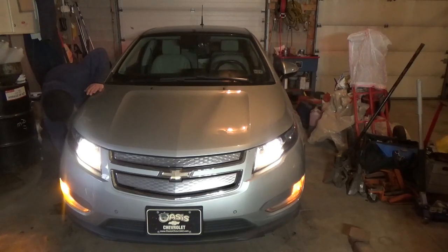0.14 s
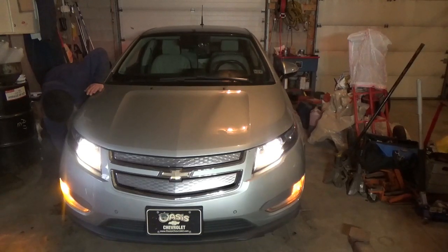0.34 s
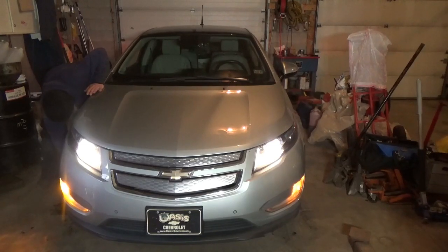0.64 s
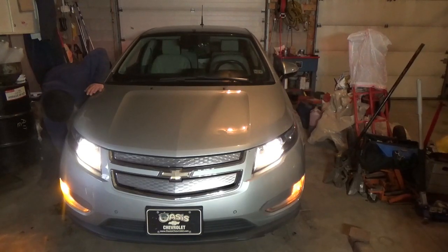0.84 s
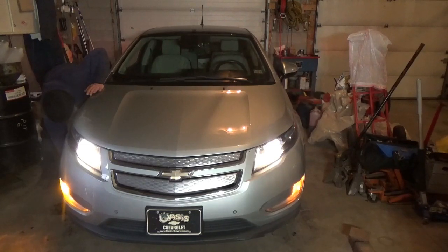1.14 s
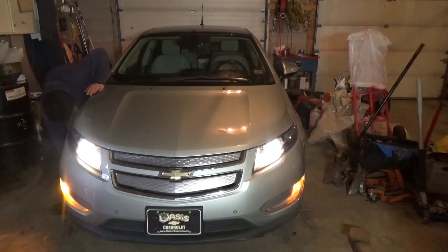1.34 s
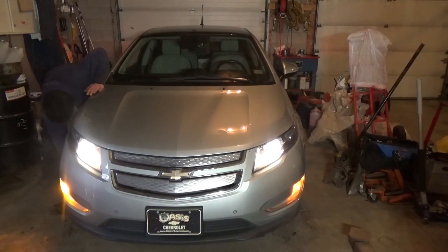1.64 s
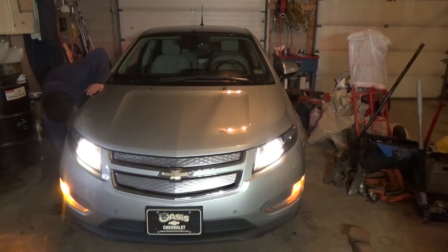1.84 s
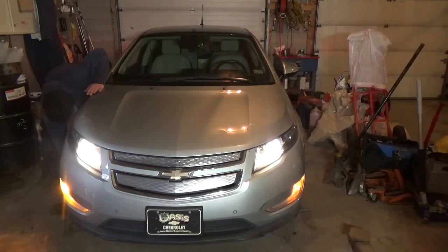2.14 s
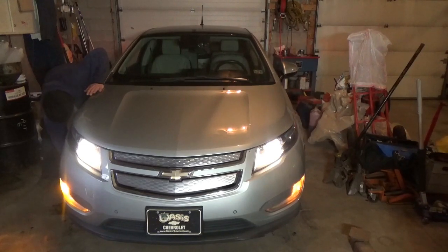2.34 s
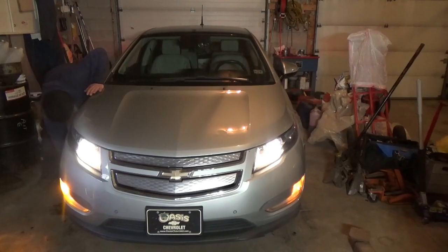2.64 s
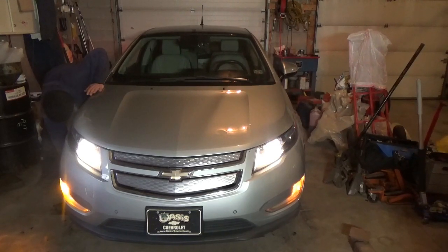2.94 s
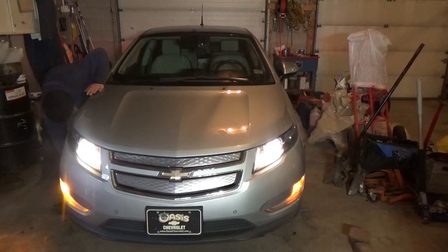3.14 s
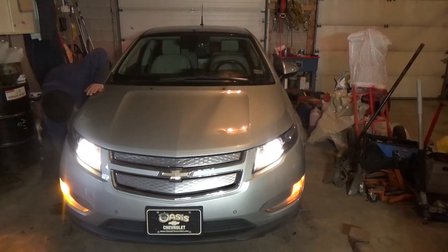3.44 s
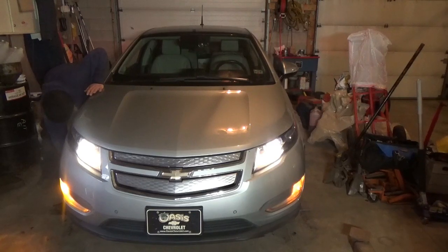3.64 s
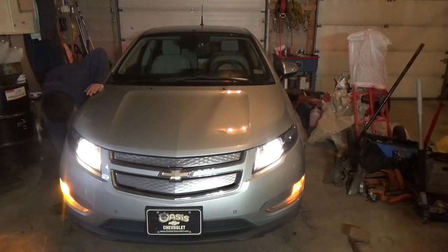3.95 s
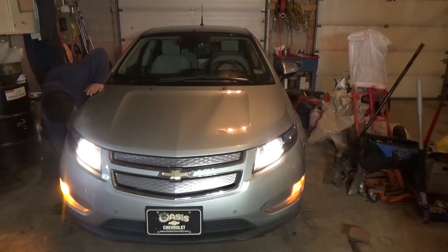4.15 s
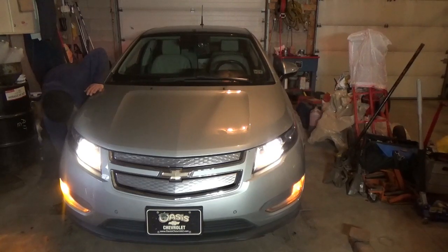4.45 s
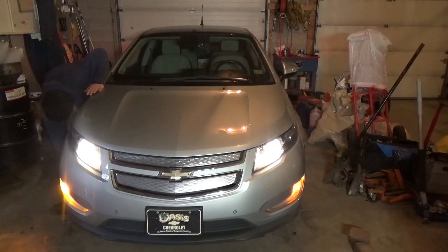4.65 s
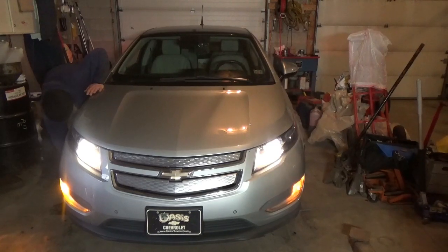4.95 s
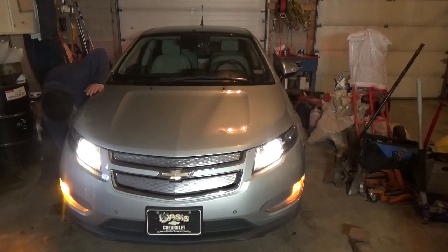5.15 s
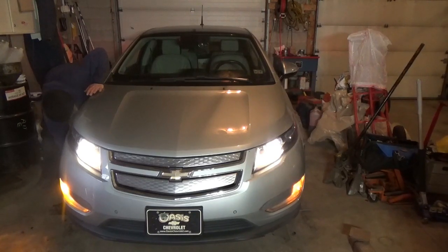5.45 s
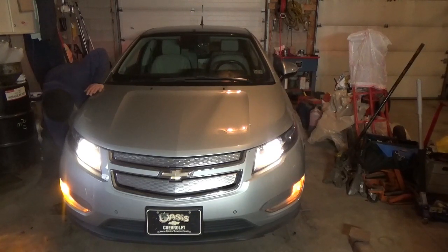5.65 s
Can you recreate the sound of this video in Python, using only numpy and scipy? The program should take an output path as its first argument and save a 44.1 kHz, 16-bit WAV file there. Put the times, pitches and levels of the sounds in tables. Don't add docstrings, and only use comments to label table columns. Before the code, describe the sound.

A strong, continuous rush of escaping tire air, bright and ringing, wavers and changes color late on, with a faint low cooling fan beneath.

```python
import sys
import numpy as np
from scipy import signal
from scipy.fft import rfft, irfft, next_fast_len
from scipy.io import wavfile
from scipy.ndimage import uniform_filter1d, map_coordinates

SR = 44100
rng = np.random.default_rng(int(sys.argv[2]) if len(sys.argv) > 2 else 0)


def ratio(d):
    e = np.asarray(d, float) / 20
    return 10 ** e


def dump_mix(stems):
    frames = np.atleast_2d(stems).T
    limited = np.clip(frames, -1, 1)
    pcm = np.round(limited * 32767).astype(np.int16)
    wavfile.write(sys.argv[1], SR, pcm)


N = 254898
T = np.arange(N) / SR
SIZE = next_fast_len(N + SR)
HZ = np.maximum(np.arange(SIZE // 2 + 1) * SR / SIZE, 1)
LEFT_RIGHT = np.array([[1], [-1]]) / 2


def unit(x):
    return x / np.sqrt(np.mean(x ** 2))


def along_hz(table):
    hz, value = np.transpose(table)
    return np.interp(np.log(HZ), np.log(hz), value)


def shaped(x, gain):
    return irfft(rfft(x, SIZE) * gain, SIZE)[..., :N]


def resonance(hz, width):
    return 1 / (1 + (2 * (HZ - hz) / width) ** 2)


def walk(rate):
    hold = int(SR / rate)
    steps = np.repeat(rng.standard_normal(N // hold + 1), hold)
    smooth = uniform_filter1d(uniform_filter1d(steps, hold), hold)
    return unit(smooth[:N])


def two_ears(alike):
    shared = rfft(rng.standard_normal(SIZE))
    own = rfft(rng.standard_normal((2, SIZE)))
    alike = np.clip(alike, 0, 1)
    return np.sqrt(alike) * shared + np.sqrt(1 - alike) * own


# (time [s], flow against the mean of the grip [dB])
FLOW = [(0.0, 0), (0.5, .5), (0.75, -.5), (0.9, .5), (1.3, 0), (4.2, 0), (4.33, -1), (4.47, 1), (4.6, -.5),
        (4.9, 0), (5.06, .5), (5.22, -.5), (5.45, 0), (5.66, 0), (5.78, -1.5)]
# (start [s], end [s])
SHIFTS = [
    (4.27, 4.44),
    (4.95, 5.29),
    (5.45, 5.6),
]
# (frequency [Hz], level [dB per Hz])
JET_STILL = [(150, -43), (250, -19.5), (366, -38.5), (403, -32), (659, -16.5), (773, -7.5), (950, -11.5),
             (1080, -6), (2070, -9.5), (2390, -5), (4030, -8.5), (4370, -6.5), (6920, -7), (8380, -13.5),
             (11200, -2.5), (14500, -57), (22000, -120)]
JET_TILTED = [(150, -52), (250, -21), (378, -32), (760, -13), (920, -17), (1100, -7), (1280, -11),
              (1510, -6.5), (2140, -8), (2890, -6.5), (3080, -6), (5120, -4), (6390, -5), (8240, -21),
              (11200, -11.5), (14500, -39), (22000, -120)]
JET_LOOSE = [(150, -53), (250, -22), (472, -26), (638, -9), (810, -9), (891, -6), (1530, -9), (1940, -8),
             (2390, -12.5), (3970, -5), (5720, -4), (8240, -7), (11200, 1.5), (14500, -38), (22000, -120)]
JET_TURNED = [(150, -49), (250, -18), (511, -17), (628, -7), (714, -21), (760, -8), (1100, -15),
              (1210, -12), (1770, -7.5), (2310, -13.5), (5280, -9), (7860, -11), (11200, 6), (14500, -38),
              (22000, -120)]
# (frequency [Hz], width [Hz], level [dB])
RING_STILL = [(4273, 35, -3), (4380, 60, -5), (4460, 50, -5), (4540, 40, -3), (4655, 30, -6),
              (4829, 40, -3), (4936, 30, -3), (5110, 50, -5), (5155, 25, -4), (5200, 25, -2),
              (5315, 30, -3), (5437, 30, -4), (5670, 60, -3), (5760, 40, -4), (5862, 25, -1),
              (6018, 35, -4), (6210, 25, 1), (6255, 25, -2), (6420, 60, -4), (6529, 35, -3), (6600, 25, -4),
              (6690, 30, -1), (6770, 50, -3), (6830, 30, -3), (6933, 25, -3), (7030, 60, -5),
              (1618, 94, -6), (1895, 94, -7.5), (2308, 31, -6), (2675, 36, -10), (3040, 50, -7.5),
              (3472, 79, -7), (3800, 30, -4), (7500, 77, -23), (8290, 81, -10), (10000, 64, -15),
              (10600, 160, -3.5), (10940, 59, 3.5)]
RING_TILTED = [(4950, 250, -4), (5280, 350, -1), (5600, 150, -4), (6150, 150, -3), (6600, 120, -5),
               (10850, 200, -2)]
RING_LOOSE = [(4040, 250, -9), (5480, 250, -2), (5850, 250, -2), (6590, 150, -5), (10900, 200, -2)]
RING_TURNED = [(1750, 300, -11), (4030, 250, -6), (5200, 400, -3), (5770, 150, -4), (10900, 250, -2)]
VALLEY = (-4.5, -0.5, 1.5, 2)
SCATTER = (-2.5, -8.5, -6.5, -7.5)
SWAY = (0.26, 0.81, 1, 0.87)
WANDER = (.0001, .0012, .0012, .0012)
# (low rush [dB], throat [dB], jet [dB], top whistle [dB], lean to the left [dB])
GRIP_LEVELS = [
    (-41.5, -37.5, -28, -30, 0.1),
    (-39, -34, -24.5, -29, -0.3),
    (-42.5, -37.5, -27, -30, -.2),
    (-41, -37, -26.5, -28.5, -.1),
]
FOLLOW = (0.5, 1.1, 1.06, .3)


def escaping_air():
    flow_db = np.interp(T, *np.transpose(FLOW))
    shifted = [np.interp(T, shift, (0, 1)) for shift in SHIFTS]
    moved = np.array([np.ones(N)] + shifted + [np.zeros(N)])
    shares = np.clip(moved[:-1] - moved[1:], 0, 1)
    colours = (JET_STILL, JET_TILTED, JET_LOOSE, JET_TURNED)
    rings = (RING_STILL, RING_TILTED, RING_LOOSE, RING_TURNED)
    parts = 0
    for share, *settings in zip(shares, colours, rings, VALLEY, SCATTER, SWAY, WANDER):
        parts = parts + np.sqrt(share) * np.array(chuck_grip(*settings))
    *band_db, lean_db = np.transpose(GRIP_LEVELS) @ shares
    flicker_db = np.outer((0, 0, 0, 1), 0.39 * walk(14) + 0.34 * walk(50))
    gains = ratio(np.array(band_db) + np.outer(FOLLOW, flow_db) + flicker_db)
    return np.sum(gains[:, None] * parts, axis=0) * ratio(lean_db * LEFT_RIGHT)


# (frequency [Hz], width [Hz], level [dB])
GARAGE_MODES = [(564, 34, -19), (626, 32, -10), (712, 44, -11), (762, 16, -4), (845, 22, -7),
                (915, 14, -7.5), (1010.5, 25, -3), (1074.4, 17.3, 2.5), (1115, 22, -1), (1200, 20, -2.5),
                (1213, 8.2, -5.5), (1270, 9.4, -15), (1351, 25, -2), (1417, 8.6, -15), (1462, 8.7, -1)]


def chuck_grip(colour, rings, valley_db, scatter_db, sway, wander_s):
    broad = ratio(along_hz(colour) + valley_db)
    ringing = 0
    for hz, width, db in rings + GARAGE_MODES:
        ringing = ringing + ratio(2 * db) * resonance(hz, width) ** 1.52
    flutter_db = 0.97 * (0.68 * walk(9) + 0.5 * walk(40))
    jet = shaped(rng.standard_normal(N) * ratio(flutter_db), np.sqrt(broad ** 2 + ringing))
    jet = map_coordinates(jet, [(T + wander_s * walk(3)) * SR], order=3, mode="mirror")
    angle = sway * walk(1.466)
    walls = np.cos(angle) * shaped(jet, wall_echoes()) + np.sin(angle) * shaped(jet, wall_echoes())
    scattered = ratio(scatter_db) * broad * two_ears(0.12)
    heard = (rfft(jet + walls, SIZE) + scattered) * from_the_right()
    return [unit(irfft(heard * share, SIZE)[:, :N]) for share in bands()]


BAND_EDGES = (1500, 3500, 7300)


def bands():
    above = [np.clip(0.5 + 3 * np.log2(HZ / edge), 0, 1) for edge in BAND_EDGES]
    return [1 - above[0], above[0] - above[1], above[1] - above[2], above[2]]


# (frequency [Hz], left minus right [dB])
LEFT_TILT = [(60, -9), (110, -2), (190, 0.0), (350, -5.5), (630, -0.5), (1120, -1.5), (2020, -1.5),
             (3620, -2.0), (6510, -1.5), (11700, 0)]


def from_the_right():
    left_lag_s = 2.2e-5
    lag = np.exp(-2j * np.pi * HZ * left_lag_s * LEFT_RIGHT)
    return lag * ratio(along_hz(LEFT_TILT) * LEFT_RIGHT)


# (frequency [Hz], share [0-1])
ALIKE = [(250, .5), (1000, 0.04), (2500, 0.64), (6000, 0.16), (9000, 0.6), (11000, 0.33)]


def wall_echoes():
    t60_s, level_db = 0.25, -4.5
    t = np.arange(SIZE) / SR
    fade = np.exp(-np.log(1000) * t / t60_s) * (t > 0.002)
    tail = irfft(two_ears(along_hz(ALIKE)), SIZE) * fade
    tail = ratio(level_db) * tail / np.sqrt(np.sum(tail ** 2, axis=1, keepdims=True))
    return rfft(tail) * np.clip(HZ / 2500, 0.6, 1)


# (frequency [Hz], level [dB], width of the waver [Hz])
FAN_LINES = [
    (65.2, -63, 1.8),
    (200, -60.5, 5.7),
    (294, -70.5, 4),
    (405, -75.5, 2.2),
    (421, -75, 3.4),
]
# (frequency [Hz], level [dB per Hz])
FAN_AIR = [(12, -45), (20, -40), (53, -6), (135, -7.5), (195, -1), (335, -8.5), (403, -1.5), (506, -6.5),
           (600, 4), (780, -29), (1320, -120)]
# (time [s], half length [s], level [dB])
WASHES = [
    (4.36, .05, 3),
    (4.72, 0.16, 6),
    (5.68, .12, 3.5),
]


def fan():
    tones = 0
    for hz, db, width in FAN_LINES:
        steady = np.sin(2 * np.pi * (hz * T + rng.random()))
        waver = unit(shaped(rng.standard_normal(N), resonance(hz, width)))
        tones = tones + ratio(db) * (steady + 0.15 * waver)
    swell_db = sum(db * np.exp(-((T - time) / half) ** 2) for time, half, db in WASHES)
    noise = two_ears(np.clip(0.95 - HZ / 2600, 0.3, 1))
    rumble = unit(irfft(noise * ratio(along_hz(FAN_AIR)) * (HZ < 600), SIZE)[:, :N])
    return tones + ratio(-55.7 + swell_db) * rumble


def scene():
    return escaping_air() + fan()


def low_pass(x):
    return signal.sosfilt(signal.butter(12, 11500, fs=SR, output="sos"), x)


def record(dry):
    top_hz = 11072
    keep = np.clip((top_hz + 60 - HZ) / 120, 0, 1) ** 2
    return low_pass(shaped(dry, keep))


dry = scene()
out = record(dry)
dump_mix(out)
```